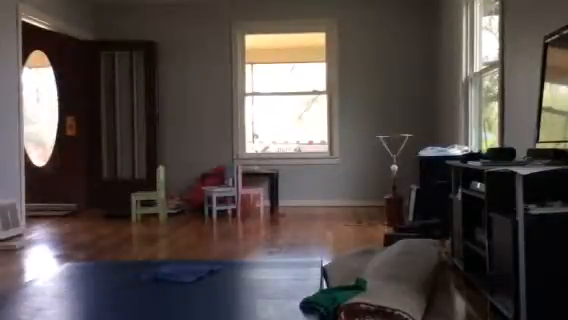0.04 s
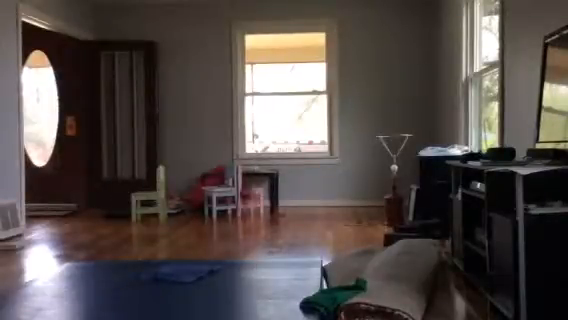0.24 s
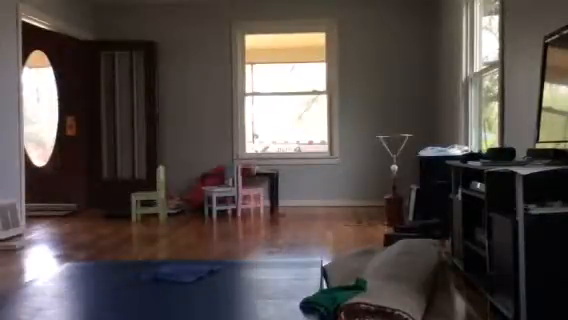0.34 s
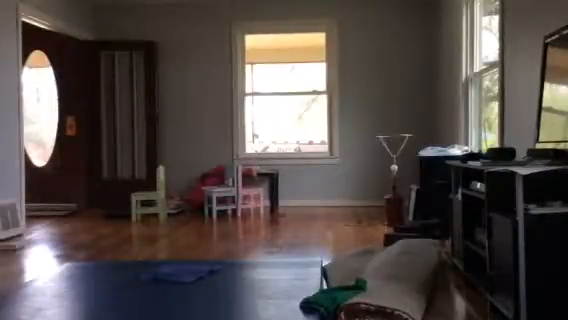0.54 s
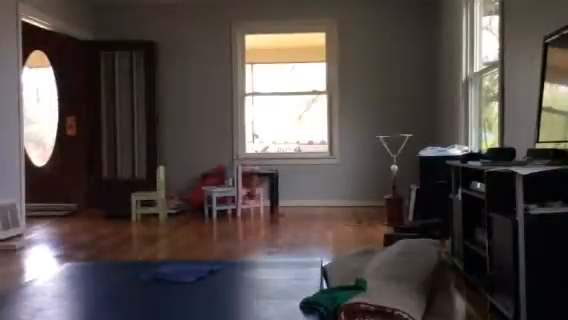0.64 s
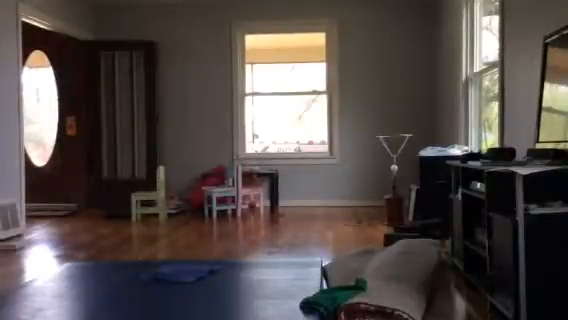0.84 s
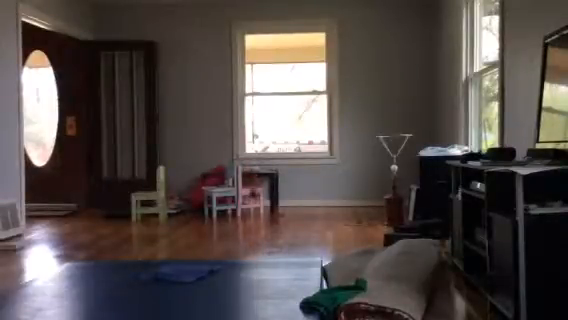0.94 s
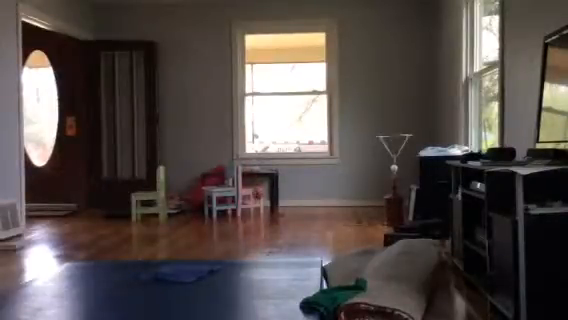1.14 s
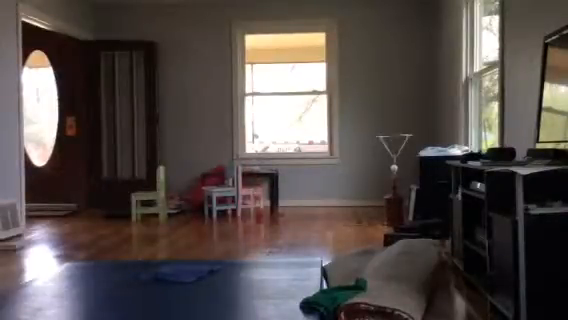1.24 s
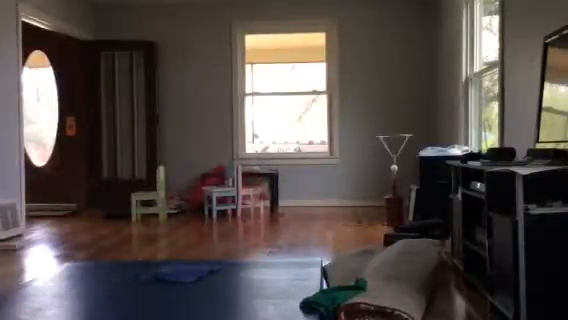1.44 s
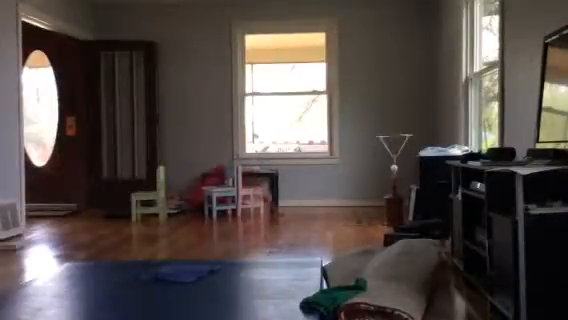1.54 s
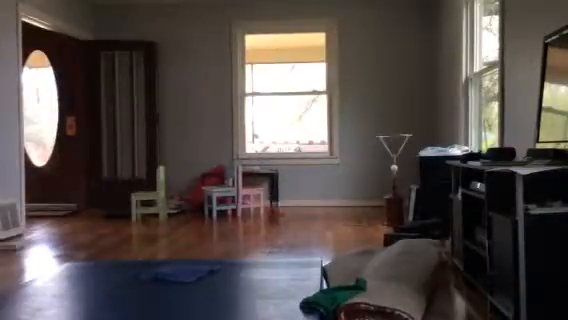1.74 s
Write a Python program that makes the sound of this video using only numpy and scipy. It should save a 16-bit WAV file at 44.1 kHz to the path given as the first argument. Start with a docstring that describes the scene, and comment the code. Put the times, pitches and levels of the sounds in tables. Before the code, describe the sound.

A small hard ball bounces four times on a wooden floor in an echoing living room. The first landing is a sharp, hollow knock; the rest come sooner and softer. A dull bump follows the third, over a quiet rumble.

```python
"""A quiet rumble fills an echoing living room. A small hard ball lands on the wooden floor:
a sharp click and a hollow knock of the boards, then wall echoes, a bright fading tail and a low boom.
The ball lands a second and a third time, each gap shorter than the one before.
A scuff and a duller bump follow, and then the ball lands a fourth and last time."""
import sys
import numpy as np
from scipy import signal
from scipy.fft import rfft, irfft
from scipy.io import wavfile
from scipy.ndimage import uniform_filter1d

SR = 44100
rng = np.random.default_rng(int(sys.argv[2]) if len(sys.argv) > 2 else 0)


def transcribe(u):
    """Save the signal u as a 16-bit wav file named by the first command-line argument.

    u: samples, shape (n,) or (channels, n), limited to [-1, 1]; the rate is SR.
    q: integer samples, one column per channel.
    """
    v = np.clip(np.atleast_2d(u).T, -1, 1)
    q = np.round(v * 32767).astype(np.int16)
    wavfile.write(sys.argv[1], SR, q)


N = 79380


def from_db(db):
    """Turn decibels into a number to multiply by."""
    return 10 ** (np.asarray(db) / 20)


def at_hz(points, hz):
    """Read between a table's rows, giving every octave equal room."""
    f, values = np.transpose(points)
    return np.interp(np.log(np.maximum(hz, 1)), np.log(f), values)


def since(s):
    """Seconds since a moment, zero before it."""
    return np.maximum(np.arange(N) / SR - s, 0)


def impulse(s):
    """A single spike at a moment."""
    return (np.arange(N) == round(s * SR)) + 1e-18


def swell(s, crest_s):
    """A loudness curve that rises smoothly to 1 and sinks again."""
    t = since(s) / crest_s
    return (t * np.exp(1 - t)) ** 2


def ring(s, hz, fade_s):
    """A struck tone that falls by 60 dB in its fade time."""
    t = since(s)
    return np.sin(2 * np.pi * hz * t) * np.exp(-np.log(1000) * t / fade_s)


def soften(x, hz, keep="low", order=2):
    """Keep the low (or the high) part of a sound."""
    return signal.sosfilt(signal.butter(order, min(hz, .45 * SR), keep, fs=SR, output="sos"), x)


def noise_spectrum(colour):
    """Frequencies and spectrum of noise; its colour says how strong lows and highs are."""
    hz = np.arange(N // 2 + 1) * SR / N
    return hz, rfft(rng.standard_normal(N)) * from_db(at_hz(colour, hz))


# colour of the background: f/Hz, level/dB
RUMBLE_COLOUR = [(20, -8), (40, -30), (60, -0.5), (82, 1.5), (110, -4), (170, -8.5), (230, -13.5),
                 (400, -16.5), (700, -27), (1500, -37), (3000, -42), (7000, -46.5), (9300, -42),
                 (11500, -50.5), (15000, -54.5)]
def rumble(level_db=-28.5):
    """The room's steady low noise, with a faint hiss."""
    _, spectrum = noise_spectrum(RUMBLE_COLOUR)
    return from_db(level_db) * irfft(spectrum, N)


def ball_click(crack_db, crack_s=0.00073, low_hz=1110, top_hz=11000):
    """The hard ball hits the floor: a spike, then a brief rough crack."""
    crack = from_db(crack_db) * rng.standard_normal(N) * np.exp(-since(0) / crack_s)
    bright = soften(crack - impulse(0), low_hz, "high", order=1)
    return soften(bright, top_hz)


# short tones of the floorboards: f/Hz, level/dB, fade time/s
BOARD_TONES = [(60, -35, 0.066), (137.3, -34.5, 0.29), (259, -29.5, 0.034), (414, -27.5, 0.044),
               (694, -21.5, 0.016), (1220, -26.5, 0.0042)]
def board_knock():
    """The struck boards shake briefly and sound hollow."""
    return sum(from_db(db) * ring(0, hz, fade_s) for hz, db, fade_s in BOARD_TONES)


# first echoes off ceiling, walls and furniture: delay/s, level/dB
FIRST_ECHOES = [(.0038, -16), (.0058, -7), (.0079, -7.5), (.0108, -12), (.0142, -9.5), (.0195, -8.5),
                (.0235, -10), (.033, -12)]
def echo_paths(s, wander=.06):
    """One spike for the direct sound and one per echo; the delays vary as the ball travels."""
    echoes = sum(from_db(db) * impulse(s + delay * (1 + wander * rng.uniform(-0.91, 1)))
                 for delay, db in FIRST_ECHOES)
    return impulse(s) + echoes


def uneven(hz, depth_db=2, spacing_hz=129.9, count=400):
    """Each spot on the floor favours its own frequencies: random peaks and dips, same overall power."""
    gain = from_db(depth_db * np.interp(hz / spacing_hz, np.arange(count), rng.standard_normal(count)))
    return gain / np.sqrt(np.mean(gain ** 2))


# how long the room rings: f/Hz, fade time/s
ROOM_FADE = [(60, 0.88), (200, 0.61), (500, 0.58), (1000, 0.68), (2200, 0.77), (4500, 0.7), (7500, 0.59),
             (11000, 0.41), (15000, 0.34)]
def room_tail(s, colour, build_s=0.0047, bands=14):
    """Countless echoes blur into noise that builds up, then dies away band by band."""
    t, tail = since(s), 0
    hz, spectrum = noise_spectrum(colour)
    spectrum = spectrum * uneven(hz)
    centres = np.geomspace(60, 15000, bands)
    for centre, share in zip(centres, np.eye(bands)):
        band = irfft(spectrum * at_hz(np.c_[centres, share], hz), N)
        tail = tail + band * np.exp(-np.log(1000) * t / at_hz(ROOM_FADE, centre))
    lumps = uniform_filter1d(rng.standard_normal(N), size=30)
    lumps_db = 2 * lumps / lumps.std() * np.exp(-t / 0.099)  # early echoes are lumpy, then merge
    walls_db = 1.5 * np.exp(-((t - FAR_WALL_S) / .005) ** 2)  # a cluster of echoes off the far walls
    return tail * (1 - np.exp(-t / build_s)) * from_db(lumps_db + walls_db)


FAR_WALL_S = .024  # delay of the far walls' echoes
# long tones of the room: f/Hz, level/dB, fade time/s
ROOM_TONES = [(369, -41.5, 0.41), (392.6, -40.5, 0.6), (449.3, -43, 0.53), (509, -45, 0.95),
              (565, -45.5, 0.84), (612, -38.5, 0.25), (715, -40.5, 0.5), (1092, -44.5, 0.54),
              (1264, -47, 0.56), (1373, -43.5, 0.4), (1520, -45.5, 0.72), (1950, -51, 1), (2110, -50, 0.89),
              (3401, -44.5, 0.66)]
def room_ring(s):
    """The room's own tones start just after the hit and ring on."""
    return sum(from_db(db) * ring(s + rng.uniform(0, FAR_WALL_S), hz, fade_s)
               for hz, db, fade_s in ROOM_TONES)


# deep tones of floor and room: f/Hz, level/dB, delay/s, rise time/s
BOOM_TONES = [(49.6, -11, 0.014, 0.043), (87.1, -1, 0.011, 0.024), (134.7, -14.5, 0.0176, 0.029),
              (78.9, -14, 0.0594, 0.063)]
def boom(s):
    """The deep tones of floor and room swell after a hit and sink."""
    return sum(from_db(db) * swell(s + delay, rise_s) * np.sin(2 * np.pi * hz * since(s + delay))
               for hz, db, delay, rise_s in BOOM_TONES)


# colours of the click's tail and the knock's tail: f/Hz, level/dB
CLICK_TAIL_COLOUR = [(100, -26), (300, -4), (600, 6), (1100, 7), (1600, 2), (2100, 6), (3500, 1.5),
                     (4900, 2), (5900, -0.5), (7500, 3.5), (10000, 1), (12000, -4), (15000, -1.5)]
KNOCK_TAIL_COLOUR = [(30, -11), (50, -2), (130, 8.5), (200, -4), (290, -1.5), (380, -1.5), (500, 3),
                     (650, 4), (850, -10.5), (1300, -4), (1800, -11), (4000, -10.5), (12000, -46)]
# the ball lands: t/s, click/dB, crack within the click/dB, click's tail/dB, knock/dB, boom/dB,
# dulled above f/Hz
LANDINGS = [(.2390, -10, -10, -34.5, -4.5, -29, 14410), (0.896, -13.5, -16, -38.5, -18.5, -33.5, 11000),
            (1.3836, -19, -22, -43.5, -28.5, -42, 11700), (1.7918, -17.5, -20.5, -40, -34.5, -48, 7500)]
def bounce(s, click_db, crack_db, tail_db, knock_db, boom_db, dull_hz):
    """One landing: click and knock arrive directly, then off the walls, then as a tail with a boom."""
    paths = echo_paths(s)
    click = from_db(click_db) * signal.fftconvolve(paths, ball_click(crack_db))[:N]  # a copy per path
    click += from_db(tail_db) * room_tail(s, CLICK_TAIL_COLOUR)
    knock = signal.fftconvolve(paths, board_knock())[:N]
    knock += from_db(-16.5) * room_tail(s, KNOCK_TAIL_COLOUR)
    knock += room_ring(s)
    return soften(click, dull_hz) + from_db(knock_db) * knock + from_db(boom_db) * boom(s)


# colours of the scuff and the thud: f/Hz, level/dB
SCUFF_COLOUR = [(300, -14), (1200, -11), (2400, 3.5), (4700, -6.5), (6000, -19), (9000, -20), (15000, -29)]
THUD_COLOUR = [(30, -32), (60, -36), (150, -11), (300, -6), (600, -12.5), (1200, -15.5), (2000, -23),
               (4000, -23.5), (12000, -47)]
# the dull bump: t/s, thud/dB, boom/dB, scuff/dB, dulled above f/Hz, build-up time/s
DULL_BUMPS = [(1.473, -23.5, -32.5, -40, 5000, 0.0082)]
def bump(s, thud_db, boom_db, scuff_db, dull_hz, build_s):
    """A soft, heavy hit, like a footstep: a short scuff, then a thud in the room."""
    _, spectrum = noise_spectrum(SCUFF_COLOUR)
    scuff = from_db(scuff_db) * swell(s, crest_s=0.011) * irfft(spectrum, N)
    thud = from_db(thud_db) * room_tail(s, THUD_COLOUR, build_s)
    return scuff + soften(thud, dull_hz) + from_db(boom_db) * boom(s)


def scene():
    """Rumble, bounces and bump added into one channel."""
    bounces = sum(bounce(*row) for row in LANDINGS)
    bumps = sum(bump(*row) for row in DULL_BUMPS)
    return (rumble() + bounces + bumps)[None]


def record(dry):
    """Cut the very highest treble steeply."""
    top_hz = 15400
    return signal.sosfilt(signal.ellip(10, .2, 70, top_hz, fs=SR, output="sos"), dry)


dry = scene()
out = record(dry)
transcribe(out)
```